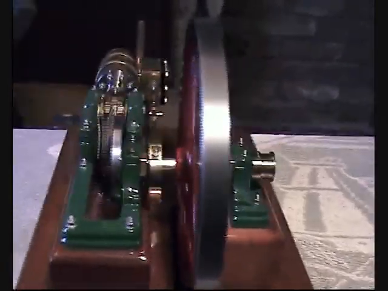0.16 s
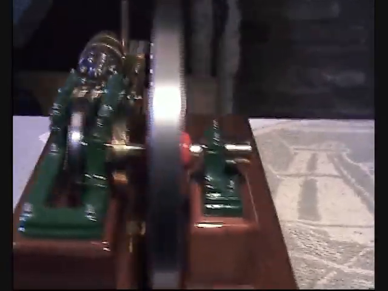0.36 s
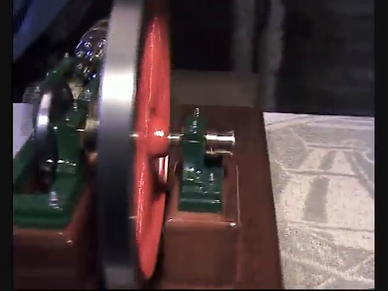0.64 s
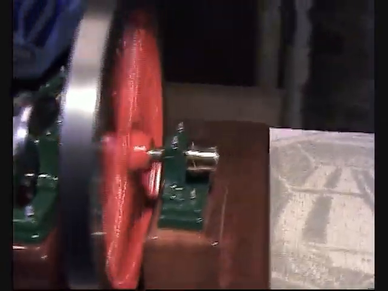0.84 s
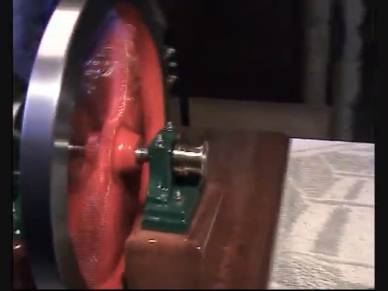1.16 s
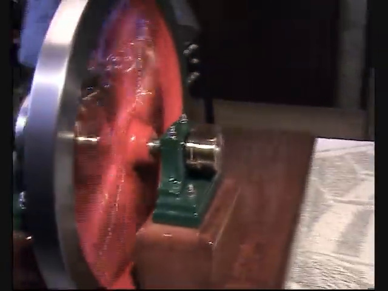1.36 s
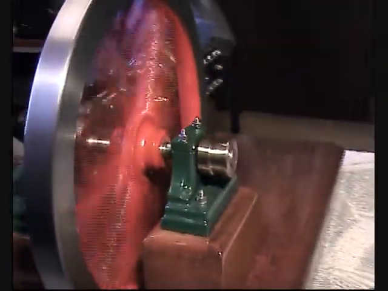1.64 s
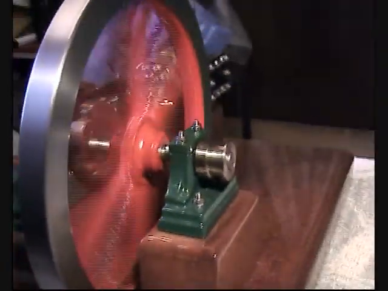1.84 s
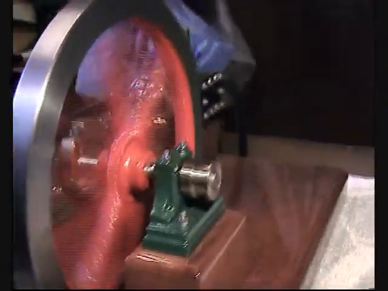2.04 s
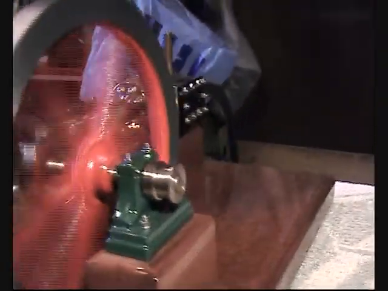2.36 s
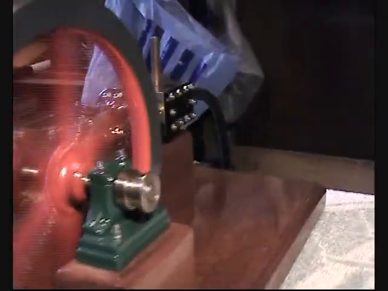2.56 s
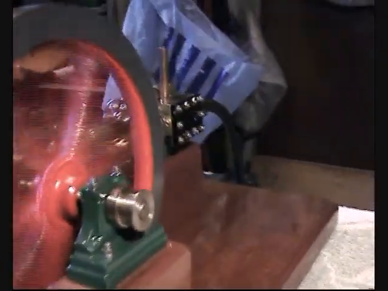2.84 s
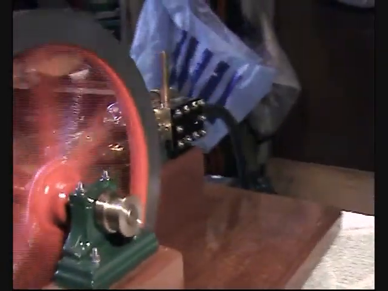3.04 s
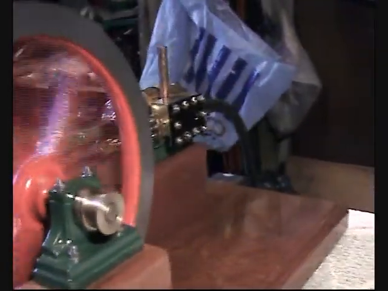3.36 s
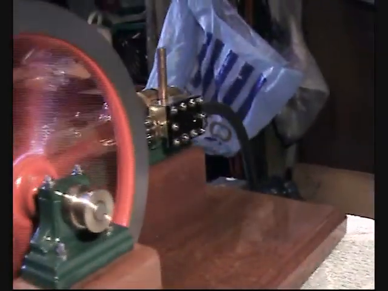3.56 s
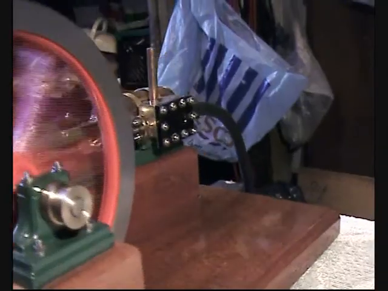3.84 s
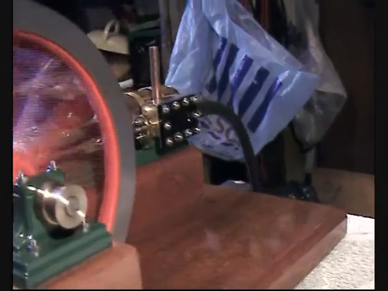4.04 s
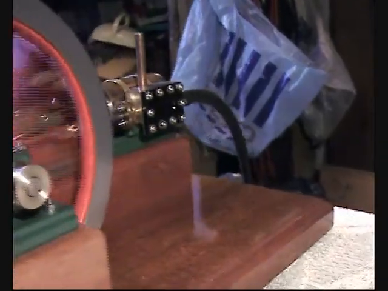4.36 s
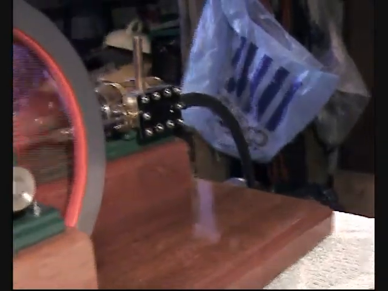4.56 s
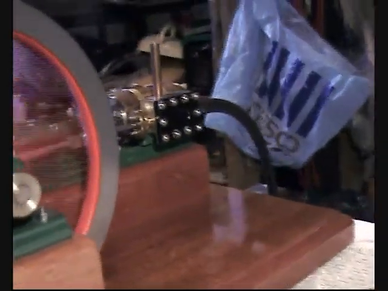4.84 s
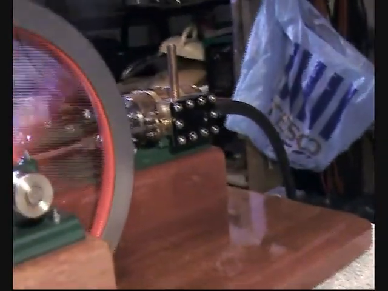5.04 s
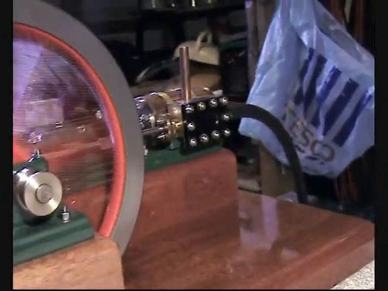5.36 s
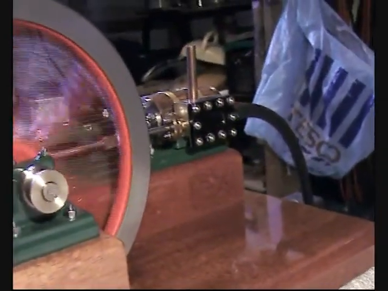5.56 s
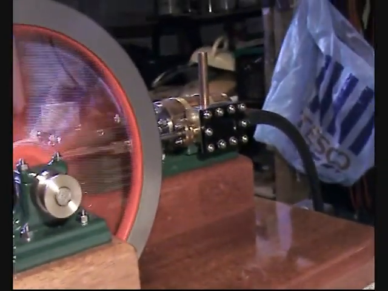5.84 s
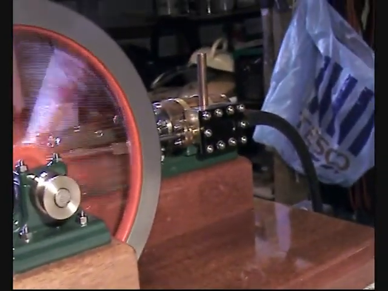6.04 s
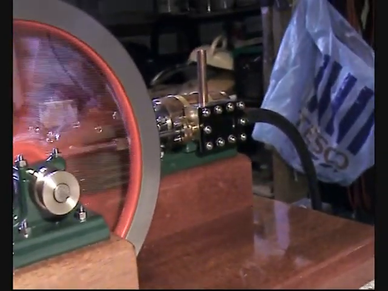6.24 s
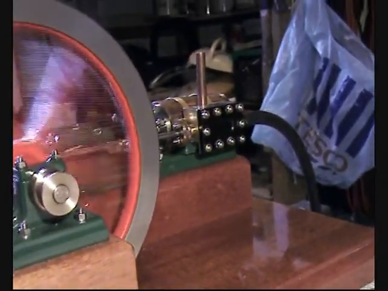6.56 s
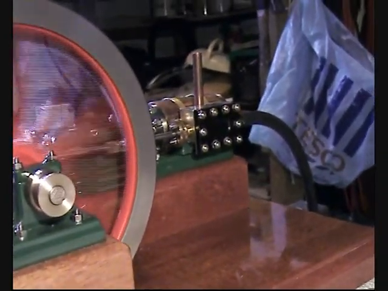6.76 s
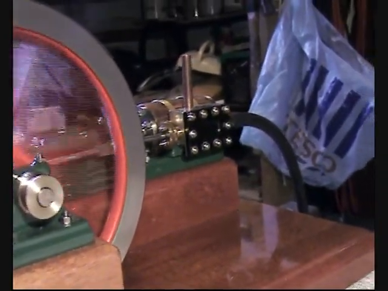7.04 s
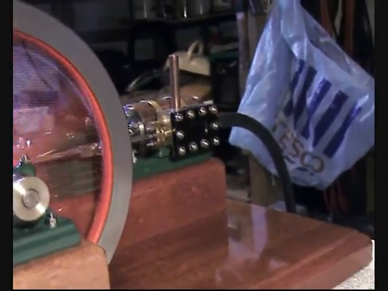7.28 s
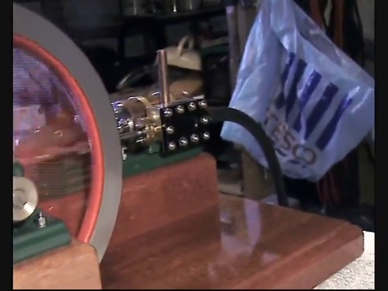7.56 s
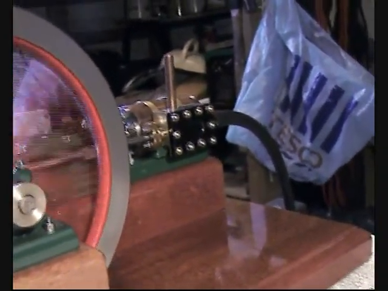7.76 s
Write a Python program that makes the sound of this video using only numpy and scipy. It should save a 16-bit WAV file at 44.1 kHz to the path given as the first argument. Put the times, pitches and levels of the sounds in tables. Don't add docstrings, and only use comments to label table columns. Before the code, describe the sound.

Continuous, busy chuffing and rattling from a miniature air-driven engine on a wooden base, already running at the start and still running at the end. Airy valve puffs and tiny hard knocks form a steady cycle, over five a second, gradually a little slower. The close stereo microphone circles it, so the hiss changes colour for about five seconds, then settles with slightly more low thump. Short indoor reflections and faint background rumble surround it.

```python
import sys
import numpy as np
from scipy import signal
from scipy.io import wavfile
from scipy.ndimage import uniform_filter1d

SR = 44100
rng = np.random.default_rng(int(sys.argv[2]) if len(sys.argv) > 2 else 0)


def unload_wav(signal):
    wavfile.write(
        sys.argv[1],
        SR,
        np.round(np.clip(np.atleast_2d(signal).T, -1, 1) * 32767).astype(np.int16),
    )


def ratio(d):
    e = np.asarray(d, float) / 20
    return 10 ** e


N = 348831

# (time [s], speed [turns/s])
SPEED = [
    (0, 5.6449),
    (1.2, 5.5856),
    (4.8, 5.4661),
    (7.0, 5.4412),
    (7.91, 5.3947),
]
# (crank angle [turns], width [turns], jet over shut valve [dB], rush over shut valve [dB])
PUFFS = [(0.008, 0.006, 5.0, 7.3), (0.102, 0.023, 6.6, 8.8), (0.133, 0.015, 6.2, 0.0),
         (0.186, 0.012, 5.3, 9.2), (0.227, 0.014, 4.9, 7.4), (0.274, 0.015, 7.4, 10.9),
         (0.351, 0.019, 4.5, 7.7), (0.413, 0.043, 6.4, 11.5), (0.495, 0.027, 5.5, 9.2),
         (0.567, 0.013, 8.1, 10.3), (0.62, 0.014, 6.2, 6.6), (0.658, 0.007, 5.1, 3.9),
         (0.719, 0.017, 6.7, 6.2), (0.776, 0.032, 5.1, 4.3), (1.011, 0.065, 1.9, 6.4)]
STROKE_STARTS = [.32, .8]
# (crank position [turns], level [dB])
STROKE_SHIFTS = [(-.1, 1.4), (.9, 2.4), (3.9, -.6), (4.9, .8), (5.9, 1.1), (6.1, 1.1), (7.9, 1.6), (9.9, -.8),
                 (10.9, -.8), (12.9, 1.6), (13.1, .9), (17.9, 1.4), (20.9, 1.3), (22.1, -2), (22.9, -.8),
                 (23.9, -1), (26.9, -1.5), (27.1, -.9), (27.9, 1.3), (28.1, 1), (29.9, 1.3), (30.9, -1.2),
                 (33.5, -.9), (35.1, .9), (35.9, 1.1), (36.9, -1.3), (37.1, -.8), (37.5, -.8)]
# (frequency [Hz], level [dB])
JET = [(800, -30.5), (1800, -12.5), (2600, -5.5), (3600, 0), (5200, 1.5), (5800, 0), (6300, -1),
       (8000, -1.5), (10300, 1.5), (11000, -4)]
# (frequency [Hz], level [dB])
RUSH = [(100, -9), (400, -16), (650, -5.5), (1000, -7), (1400, -1), (1900, 3.5), (2600, -4.5), (4000, -46)]
KNOCK_ANGLES = [.001, .008, .085, .118, .122, .186, .236, .262, .274, .336, .49, .543, .561, .563, .612,
                .655, .716, .77, .945, .025, .175, .225, .515, .6]
# (blow [dB], ring frequency [Hz], t60 [s])
KNOCKS = [(-16.5, 4500, 0.022), (-19.5, 1570, 0.024), (-5, 3200, 0.0095), (-13, 6200, .015),
          (-19.5, 917, 0.023), (-24.5, 990, 0.014), (-32, 805, 0.024), (-10, 4300, 0.028),
          (-22.5, 1316, 0.025), (-17, 1500, 0.013), (-21.5, 968, 0.021), (-14, 2300, 0.013),
          (-15, 5600, 0.044), (-23.5, 1300, 0.019), (-16, 5100, 0.0054), (-26.5, 730, 0.016),
          (-32.5, 1300, .02), (-27, 706, 0.011), (-30.5, 720, .015), (-36, 290, 0.037), (-41.5, 283, 0.035),
          (-34, 278, 0.039), (-40, 239, 0.025), (-43, 266, 0.021)]
# (time [s], place [0-5], nearness [dB])
PATH = [(0, 0, -18), (.5, 0.05, -17.7), (1, 1.02, -17.5), (1.9, 2.02, -18.1), (2.8, 3, -18.5),
        (3.3, 3.5, -18.4), (3.7, 4, -16.5), (3.85, 4.1, -16.5), (4.05, 4.8, -16.8), (5.2, 5, -17.5),
        (7.91, 5, -17.6)]
# (treble above 8 kHz [dB], low rush [dB], base thump [dB])
FACING = [(-2.1, -9.7, -38.5), (-1, -13.3, -33), (-1.8, -11.8, -32), (-1, -9.2, -33), (-4.3, -11, -28),
          (-1.4, -9.1, -25)]
# (frequency [Hz], depth [dB]); negative depth is a ridge
DIPS = [
    [(1710, -1.5), (2920, -.6), (3400, 1.5), (4200, -2.1), (5070, 3), (6150, -3), (7250, 1.5), (8300, -1.8),
     (8850, 2.5)],
    [(1730, -2.5), (2500, 3), (3450, 3), (5500, -3), (6500, 3), (5200, .1), (7250, 12), (8900, -4.5),
     (10800, 5)],
    [(1735, -3), (2500, 5), (3450, 3), (5750, -3.5), (6900, .1), (4680, -2.5), (7900, 12), (8830, -3.5),
     (10700, 3)],
    [(1600, -2.7), (2290, 5), (3400, .1), (6000, -1.1), (5240, 2.5), (4600, -4.5), (7560, 8), (9750, -3),
     (9050, 12)],
    [(1320, -3), (2165, 5), (3400, -.6), (6500, -1.5), (5100, 4), (4600, -.6), (7600, 4), (9550, -5),
     (8750, 8)],
    [(1280, -3), (2150, 8), (3400, -.6), (6200, 1.6), (4900, -1.1), (5600, -2.8), (7150, 6), (8300, 1.5),
     (9500, 8.5)],
]
DIP_WIDTHS = [250, 330, 300, 350, 250, 270, 360, 400, 280]
# (frequency [Hz], left over right [dB])
PORTS = [(60, 1), (110, -3), (190, -1), (340, 1), (600, 1), (1060, -0.5), (1880, 1), (3330, 0.0),
         (5920, -2), (10500, 4.5)]
# (frequency [Hz], level [dB])
APART = [(200, -24), (800, -20), (2000, -19), (4000, -12), (6000, -11), (8000, -8.5), (10500, -7.5)]
# (frequency [Hz], t60 [s])
WALLS = [(300, 0.15), (2000, 0.14), (6000, 0.13), (11000, 0.084)]
# (frequency [Hz], level [dB])
EDGE = [(10300, 0), (10700, -6.5), (10950, -10.5), (11100, -23), (11200, -80)]


def air(turns):
    now = stroke(turns)
    stroke_db = sum(db * (now == stroke(at)) for at, db in STROKE_SHIFTS)
    flutter_db = 1.4 * wander(2.5) + 0.4 * wander(23.0) + 1.06 * uniform_filter1d(stroke_db, 200)
    jet = evened(shaped(rng.standard_normal(N), lambda hz, t: read(JET, hz)))
    rush = evened(shaped(rng.standard_normal(N), lambda hz, t: read(RUSH, hz)))
    shut_jet_db, shut_rush_db, rush_lag_turns = -4.8, -7.5, .004
    jet_db = 0.94 * (shut_jet_db + valve_db(turns, column=2)) + flutter_db + 3.34
    rush_db = 0.87 * (shut_rush_db + valve_db(turns - rush_lag_turns, column=3)) + 1.22 * flutter_db - .4
    rush_db = rush_db + facing(1, np.arange(N) / SR)
    return jet * ratio(jet_db) + rush * ratio(rush_db)


def valve_db(turns, column):
    total = 0
    for puff in PUFFS:
        off_centre = (turns - puff[0] + .5) % 1 - .5
        total = total + puff[column] * np.exp(-.5 * (off_centre / puff[1]) ** 2)
    return total


def stroke(turns):
    return (len(STROKE_STARTS) + 1) * np.floor(turns) + np.digitize(turns % 1, STROKE_STARTS)


def linkage(turns):
    t = np.arange(2000) / SR
    out = np.zeros(N)
    for angle, (db, hz, t60) in zip(KNOCK_ANGLES, KNOCKS):
        modes = hz * np.exp(0.251 * rng.standard_normal((8, 1)))
        ring = np.sin(2 * np.pi * (modes * t + rng.random((8, 1)))).sum(0)
        ring = ring * (1 - np.exp(-t / 0.00081))
        train = blows(turns, angle, spread_db=2.0, slip_s=.0003)
        out += signal.oaconvolve(train, ring * ratio(db + 11 - 60 * t / t60))[:N]
    return out


def base(turns):
    t = np.arange(4000) / SR
    thump_hz, rise_s, fall_s = 145, .004, .025
    ring = np.sin(2 * np.pi * thump_hz * t + 2.5)
    ring = ring * (1 - np.exp(-(t / rise_s) ** 2)) * np.exp(-(t / fall_s) ** 2)
    train = blows(turns, .0, spread_db=1.0, slip_s=.0003)
    thump = evened(signal.oaconvolve(train, ring)[:N])
    return thump * ratio(facing(2, np.arange(N) / SR) - 2.6)


def blows(turns, angle, spread_db, slip_s):
    at = np.flatnonzero(np.diff(np.floor(turns - angle)))
    slip, strength = rng.standard_normal((2, len(at)))
    at = np.clip(at + (slip_s * SR * slip).astype(int), 0, N - 1)
    train = np.zeros(N)
    train[at] = ratio(spread_db * strength)
    return train


def echoes_db(hz, t, shift):
    total = (facing(0, t) + 1.77) / (1 + np.exp((7400 - hz) / 400))
    for centre, depth, width in zip(*np.transpose(DIPS), DIP_WIDTHS):
        off_centre = (hz - here(centre, t) * shift) / width
        total = total - here(depth, t) * np.exp(-.5 * off_centre ** 2)
    return total


def room(x, count=4):
    shape = (count, 2, SR // 4)
    taps = rng.choice([-1., 1.], shape) * (rng.random(shape) < .05)
    taps[..., :40] = 0
    tails = shaped(taps, lambda hz, t: -60 * t / read(WALLS, hz), size=256)
    tails = tails / np.linalg.norm(tails[0, 0])
    place = np.arange(N) / SR / .35 + .3 * wander(300.0)
    away = abs((place - np.arange(count)[:, None] + count / 2) % count - count / 2)
    shares = np.cos(np.pi / 2 * np.minimum(away, 1))
    heard = signal.fftconvolve((x * shares)[:, None], tails, axes=2)
    return heard.sum(0)[:, :N]


def grain(dry):
    level = np.sqrt(abs(uniform_filter1d(dry ** 2, 260)))
    return ratio(-14) * level ** 0.92 * rng.standard_normal((2, N))


def rumble():
    return shaped(rng.standard_normal((2, N)), lambda hz, t: -26 - 30 * hz / (hz + 150), size=2048)


def path(column, t):
    return np.interp(t, [row[0] for row in PATH], [row[column] for row in PATH])


def here(values, t):
    return np.interp(path(1, t), np.arange(len(values)), values)


def facing(column, t):
    return here(np.transpose(FACING)[column], t)


def read(points, hz):
    f, value = np.transpose(points)
    return np.interp(np.log(hz + 1), np.log(f + 1), value)


def evened(x):
    return x / np.sqrt(np.mean(x ** 2) + 1e-20)


def shaped(x, db_of, size=512):
    overlap = size * 3 // 4
    hz, t, z = signal.stft(x, SR, nperseg=size, noverlap=overlap)
    return signal.istft(z * ratio(db_of(hz[:, None], t)), SR, nperseg=size, noverlap=overlap)[1][..., :N]


def wander(ms):
    return evened(uniform_filter1d(rng.standard_normal(N), int(ms * SR / 1000) + 1))


def scene():
    t = np.arange(N) / SR
    first_turn = -.7634
    turns = first_turn + np.cumsum(np.interp(t, *np.transpose(SPEED))) / SR
    engine = ratio(path(2, t)) * (air(turns) + linkage(turns) + base(turns))
    left = shaped(engine, lambda hz, t: echoes_db(hz, t, 0.99) + read(PORTS, hz) / 2)
    right = shaped(engine, lambda hz, t: echoes_db(hz, t, 0.969) - read(PORTS, hz) / 2)
    walls = room(shaped(engine, lambda hz, t: read(APART, hz)))
    return np.array([left, right]) + walls


def band_limit(x):
    return signal.sosfilt(signal.butter(12, 11110, fs=SR, output="sos"), x)


def record(dry):
    noisy = dry + grain(dry) + rumble()
    limited = 1.337 * np.tanh(noisy / 1.254)
    mix = shaped(limited, lambda hz, t: read(EDGE, hz), size=1024)
    return band_limit(mix)


dry = scene()
out = record(dry)
unload_wav(out)
```